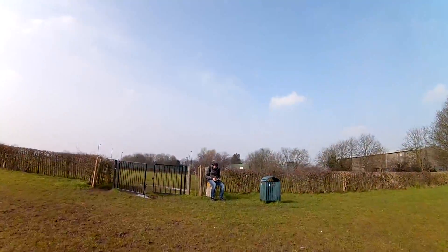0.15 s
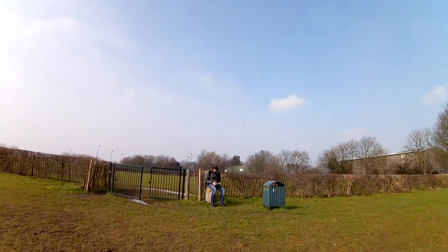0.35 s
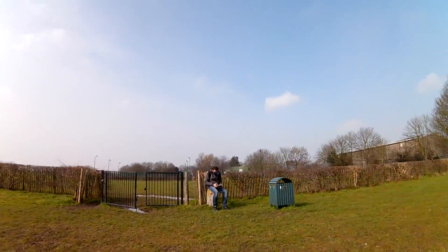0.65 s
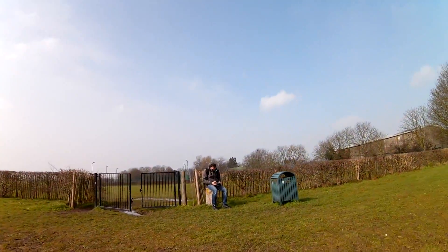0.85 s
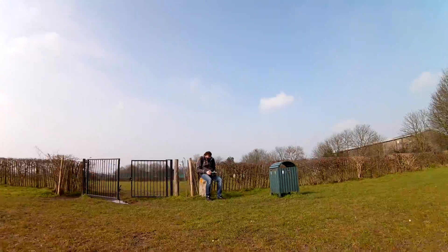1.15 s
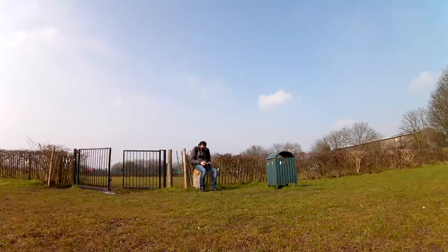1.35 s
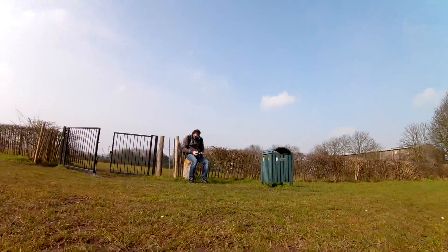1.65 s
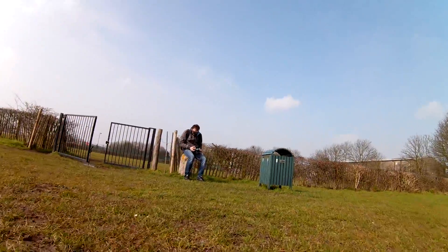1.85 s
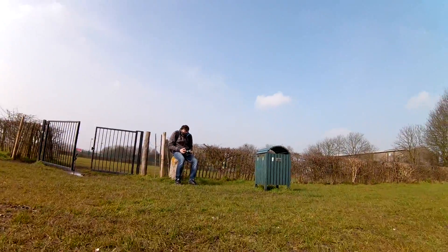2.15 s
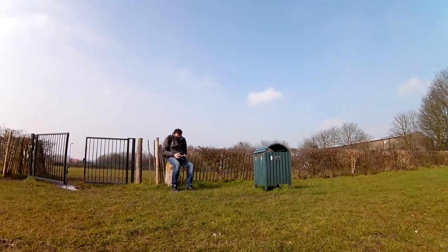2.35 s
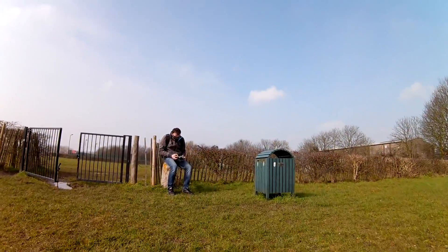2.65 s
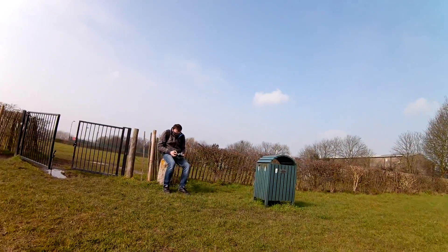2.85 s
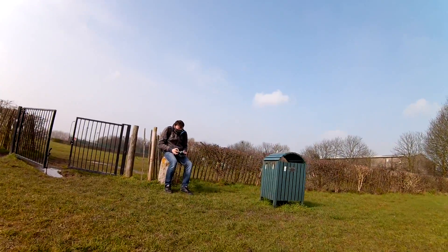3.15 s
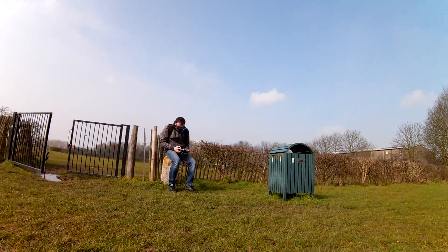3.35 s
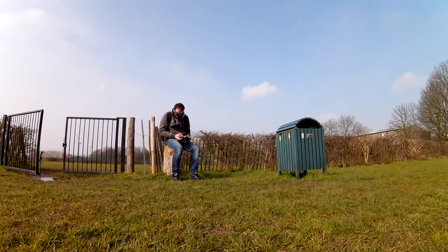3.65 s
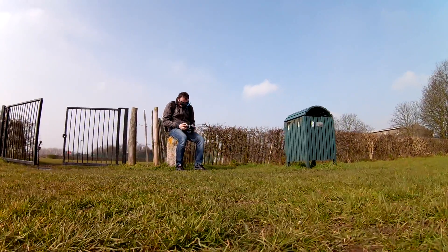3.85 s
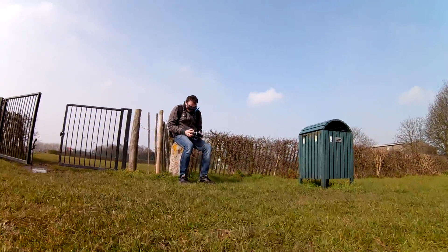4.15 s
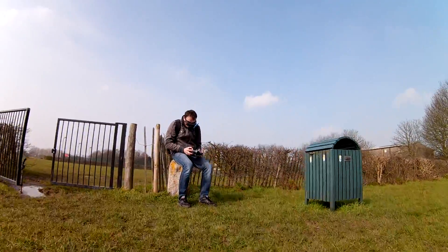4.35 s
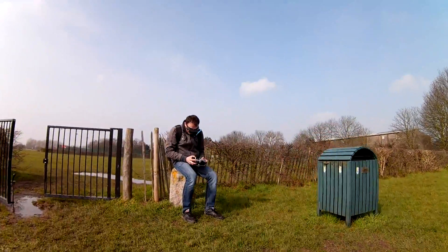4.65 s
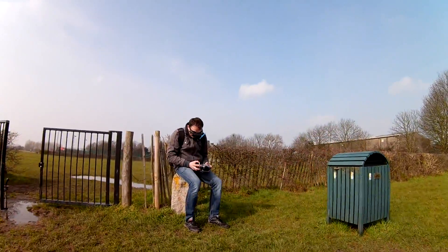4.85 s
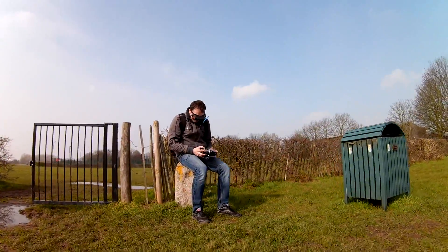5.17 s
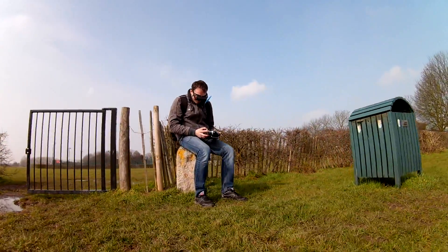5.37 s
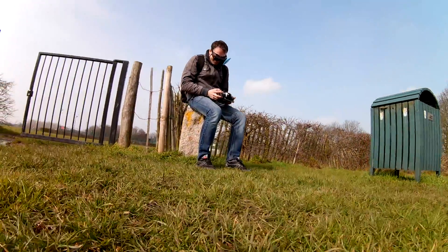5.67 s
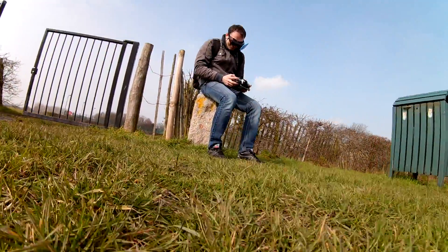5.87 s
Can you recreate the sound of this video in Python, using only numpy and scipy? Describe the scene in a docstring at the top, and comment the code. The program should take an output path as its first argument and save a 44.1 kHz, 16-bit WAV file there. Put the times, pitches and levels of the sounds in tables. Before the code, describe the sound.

Continuous close propeller buzz from a small drone, dry and outdoors, thin in the bass and gritty in the upper mids. Throttle changes bend the pitch up and down while slightly mistuned rotors beat together. Brief rattling buzzes shake the frame; rough growls swell when it skims the grass near four seconds and again at the end. The loudest surges distort, and a faint high motor whine sits above.

```python
"""Over a grassy field, a small racing quadcopter is heard by the camera on its own frame.
Four two-blade propellers sing as harmonics of their blade rates, which beat against each other.
Noise pulsed by the blades gives the wash, uneven pulse trains the blade slap, high tones the motor whine.
Resonant noise makes short frame buzzes, and low growls swell in dips to the grass; the loudest peaks clip."""
import sys
import numpy as np
from scipy import signal
from scipy.fft import rfft, irfft, next_fast_len
from scipy.io import wavfile
from scipy.ndimage import uniform_filter1d

SR = 44100
rng = np.random.default_rng(int(sys.argv[2]) if len(sys.argv) > 2 else 0)


def to_wav(sig):
    """Store sig (one row per channel, or 1-D mono) as 16-bit WAV at the path in sys.argv[1].

    Samples outside -1..1 are clipped; the rate is SR.
    """
    pcm = np.clip(np.atleast_2d(sig), -1, 1) * 32767
    pcm = np.round(pcm).astype(np.int16)
    wavfile.write(sys.argv[1], SR, pcm.T)  # frames by channels


N = 265041

# turbulence shed by the blades, lower and upper spectrum: (frequency [Hz], relative level [dB])
WASH_SPECTRUM = [(30, -54), (200, -33.5), (300, -30), (520, -25.5), (850, -20), (1300, -5), (1650, -0.5),
                 (1950, -3), (2400, 4), (2800, -4), (3300, -5.5), (3900, -3), (4800, -6), (5500, -17.5)]
HISS_SPECTRUM = [(6100, -16), (6700, -22.5), (7500, -23.5), (8300, -31), (8900, -17), (9700, -29),
                 (11500, -22), (12700, -30.5), (13800, -38), (15000, -46)]
# reference blade rate and gap between the pairs, at which the layer laws hold
CRUISE_HZ, CRUISE_SPLIT_HZ = 400, 17.5


def undb(db):
    """Decibels to gain."""
    return 10 ** (np.asarray(db) / 20)


def unit(x):
    """Scale to rms 1."""
    return x / np.sqrt(np.mean(x ** 2))


def curves(table):
    """Columns of a timed table, interpolated at every sample."""
    times_s, *columns = np.transpose(table)
    t = np.arange(N) / SR
    return [np.interp(t, times_s, column) for column in columns]


def wander(rate_hz, size=8192):
    """Smooth random signal of rms 1: coarse noise, low-passed near rate_hz."""
    hz = np.arange(size // 2 + 1) * SR / N
    lowpass = np.exp(-.5 * (hz / rate_hz) ** 2)
    coarse = irfft(rfft(rng.standard_normal(size)) * lowpass, size)
    return np.interp(np.linspace(0, size - 1, N), np.arange(size), unit(coarse))


def colour(x, spectrum):
    """Filter by (Hz, dB) points, interpolated on log frequency; rms 1."""
    hz, db = np.transpose(spectrum)
    size = next_fast_len(N, True)
    bins_hz = np.maximum(np.arange(size // 2 + 1) * SR / size, 1)
    gain = undb(np.interp(np.log(bins_hz), np.log(hz), db))
    return unit(irfft(rfft(x, size) * gain, size)[:N])


def ring(force, modes):
    """Drive parallel (Hz, width Hz, dB) resonances with a force; rms 1."""
    total = 0
    for hz, width_hz, db in modes:
        b, a = signal.iirpeak(hz, hz / width_hz, fs=SR)
        total = total + undb(db) * signal.lfilter(b, a, force)
    return unit(total)


def corrected(hz, share=.012, rate_hz=9, speed_power=6.003):
    """Small quick flight-control corrections rock a pair's speed, far more at high speed."""
    depth = share * (hz / CRUISE_HZ) ** speed_power
    return hz * (1 + depth * np.tanh(wander(rate_hz)))


def spin(hz, hunting=0.003, flutter=0.002014):
    """Blade phase of one rotor: its speed, wavering slightly in moving air, integrated."""
    wavering_hz = hz * (1 + hunting * wander(9.99) + flutter * wander(30.2))
    return 2 * np.pi * np.cumsum(wavering_hz) / SR + rng.uniform(0, 2 * np.pi)


def spool_up(hz, limit=0.37, window_s=0.4):
    """Rate of speed rise [octave/s], averaged over a window; saturates both ways."""
    octaves_per_s = np.gradient(np.log2(hz)) * SR
    rise = uniform_filter1d(octaves_per_s, size=int(window_s * SR))
    return limit * np.tanh(rise / limit)


def follow(law, hz, spool, split_hz):
    """Layer gain from rotor speed, spool-up and the gap between the pairs when steering."""
    db, speed_db, spool_db, split_db = law
    speed_octaves = np.log2(hz / CRUISE_HZ)
    split_octaves = np.log2(split_hz / CRUISE_SPLIT_HZ)
    return undb(db + speed_db * speed_octaves + spool_db * spool + split_db * split_octaves)


def blade_tone(phase, thrust, unrest, upper_law=0.77, sway=0.027, rough=0.074, blur_db=2.3):
    """Blade-pass harmonics: the first follows thrust; disturbed air shakes all and dulls the upper ones."""
    # blade harmonics, interpolated between rows: (multiple of blade rate, relative level [dB])
    blade = [(1, -1.5), (2, -7), (3, -7), (4, -5), (5, -7), (6, -8.5), (7, -11.5), (8, -11.5), (10, -14.5),
             (14, -26)]
    multiples, db = np.transpose(blade)
    gust = np.tanh(wander(29))
    swirl = wander(37) * unrest
    upper = thrust ** upper_law * undb(blur_db * (1 - unrest))
    tone = 0
    for k in np.arange(len(blade) + 2) + 1:
        strength = thrust if k == 1 else upper
        partial = rng.choice([-1, 1]) * np.sin(k * (phase + rough * swirl)) * strength
        tone = tone + undb(np.interp(k, multiples, db)) * partial * (1 + sway * np.sqrt(k) * gust)
    return tone


def wash(phases, shares, depth=0.71, swell_db=2.3):
    """Blade turbulence: noise pulsing once per blade pass, with random gusts."""
    air = 0
    for phase, share in zip(phases, shares):
        air = air + share * np.exp(depth * np.cos(phase)) * rng.standard_normal(N)
    return air * undb(swell_db * np.tanh(wander(16)))


def blade_slap(phases, shares, sharpness=14, stagger=0.17, scatter=0.65, air_db=-4):
    """Blades strike vortices left by others: sharp, uneven pulses plus torn air."""
    # slap spectrum: (frequency [Hz], relative level [dB])
    chopped_air = [(30, -28), (300, -24.5), (550, -11), (780, -6), (950, -6), (1300, 0.5), (1650, 2),
                   (2100, -13.5), (4000, -1.5), (8000, -35.5), (15000, -55)]
    slaps = 0
    for phase, share in zip(phases, shares):
        pulses = np.exp(sharpness * (np.cos(phase + stagger * wander(42)) - 1))
        slaps = slaps + share * pulses * (1 + scatter * wander(70))
    torn_air = colour(wash(phases, shares), chopped_air)
    return colour(slaps - slaps.mean(), chopped_air) + undb(air_db) * torn_air


def bursts(rows):
    """Steep-sided swells from (centre [s], peak [dB], -3 dB length [s]) rows."""
    t, swell = np.arange(N) / SR, np.zeros(N)
    for centre_s, db, length_s in rows:
        near = slice(*np.searchsorted(t, [centre_s - 2 * length_s, centre_s + 2 * length_s]))
        offset = np.abs(2 * (t[near] - centre_s) / length_s)
        swell[near] += undb(db) * np.exp2(-offset ** 3 / 2)
    return swell


def rattles(rate_per_s=22, length_s=0.0096, spread_db=2.5):
    """Short weak swells of vibration at uneven intervals through spells of shaking."""
    # spells of shaking: (start [s], end [s], relative level [dB])
    shakes = [(1.011, 1.42, -12), (2.662, 2.82, -18), (3.18, 3.56, -15), (4.979, 5.35, -14.5),
              (5.723, 5.94, -12)]
    rows = []
    for start_s, end_s, db in shakes:
        gap, strength, stretch = rng.uniform(-1, 1, size=(64, 3)).T
        times_s = start_s + np.cumsum(2 ** gap) / rate_per_s - 1 / rate_per_s
        lengths_s = length_s * 2 ** (stretch / 2)
        spell = np.transpose([times_s, db + spread_db * strength, lengths_s])
        rows.extend(spell[times_s < end_s])
    return bursts(rows)


def frame_buzz(phase, depth=0.48, grit_db=-8, buzz_db=1.5):
    """Blade-pulsed vibration rattles the frame at its resonances, in bursts."""
    # hard bursts: (centre [s], relative peak [dB], length [s])
    buzzes = [(1.114, -10, .009), (1.23, -11.5, 0.018), (1.338, -9, .012), (1.406, -9, .014),
              (1.435, -7.5, 0.017), (1.5, -10, 0.025), (1.662, -7, .011), (1.866, -9, 0.012),
              (2.088, -9, .03), (2.215, -9, 0.021), (2.276, -8, .012), (2.35, -9.5, 0.029),
              (2.42, -7.5, 0.043), (2.474, -7, 0.027), (3.091, -10, 0.021), (3.272, -12.5, 0.0091),
              (3.332, -9, .012), (3.368, -9.5, 0.023), (3.436, -10, 0.014), (3.588, -8, 0.011),
              (3.661, -9.5, 0.033), (4.177, -8.5, 0.0099), (5.214, -10, 0.012), (5.37, -6.5, .011),
              (5.411, -6.5, 0.01), (5.446, -6.5, 0.011), (5.554, -8, 0.015), (5.586, -8, 0.015),
              (5.828, -8.5, 0.028), (5.884, -10.5, 0.0061)]
    # frame resonances: (frequency [Hz], width [Hz], relative level [dB])
    frame = [(1544, 71, -9), (2393, 110, 9.5), (3017, 47, 2), (4244, 286, -7), (5550, 110, -9.5)]
    # soft camera mount, passes little treble: (frequency [Hz], relative level [dB])
    mount = [(100, -32), (1000, 4), (2000, 1.5), (5600, 1), (7500, -12), (12000, -3), (15000, -16)]
    swell = np.maximum(bursts(buzzes), rattles())
    force = rng.standard_normal(N) * np.exp(depth * np.cos(phase))
    body = ring(force, frame)
    # the loose part swings between its stops, so its amplitude stays even
    body = body / np.sqrt(uniform_filter1d(body ** 2, size=120))
    grit = colour(force, WASH_SPECTRUM + HISS_SPECTRUM)
    return undb(buzz_db) * swell * colour(body + undb(grit_db) * grit, mount)


def ground_effect(rise_db_per_s=141, fall_db_per_s=85):
    """Gain of the near-grass layers: swells as the craft sinks, holds, fades as it lifts."""
    # dips to just above the grass: (start [s], length [s], relative level [dB])
    skims = [(3.935, 0.16, -16), (5.72, .04, -17.5), (5.979, .05, -25)]
    t = np.arange(N) / SR
    gain = 0
    for start_s, length_s, db in skims:
        before_db = rise_db_per_s * np.maximum(start_s - t, 0)
        after_db = fall_db_per_s * np.maximum(t - start_s - length_s, 0)
        gain = gain + undb(db - before_db - after_db)
    return gain


def growl(phases, shares, smear=0.67, air_db=-4, throb=0.11, count=3):
    """Returning eddies scramble each blade stroke, smearing low harmonics into rough bands."""
    # growl spectrum: (frequency [Hz], relative level [dB])
    growl_spectrum = [(30, -16), (250, -26.5), (450, -15), (620, -16), (780, -8), (920, 2), (1100, -1),
                      (1400, 1), (1700, 4), (2100, -40), (4000, -2), (8000, -27), (15000, -58)]
    bands = 0
    for phase, share in zip(phases, shares):
        for k in np.arange(count) + 2:
            bands = bands + share * np.sin(k * (phase + smear * wander(44))) * wander(16)
    noise = colour(rng.standard_normal(N), growl_spectrum)
    air = colour(bands, growl_spectrum) + undb(air_db) * noise
    return air * (1 + throb * np.tanh(wander(29)))


def skim_tones(phases, shares):
    """Clear low harmonics from blades working against the cushion of air under them."""
    # lifted harmonics: (multiple of blade rate, level against the growl [dB])
    harmonics = [(2, -8.5), (3, -13), (4, -17)]
    tones = 0
    for phase, share in zip(phases, shares):
        for k, db in harmonics:
            start = rng.uniform(0, 2 * np.pi)
            tones = tones + share * undb(db) * np.sin(np.round(k) * phase + start)
    return tones


def magnet_tones(phase, low_db=-3, waver_db=2):
    """Magnets pass the stator teeth: tones at 14 and 28 times the blade rate."""
    magnets = 14 * phase
    return (np.sin(2 * magnets) + undb(low_db) * np.sin(magnets)) * undb(waver_db * wander(3.5))


def motor_whine(phases, shares):
    """Magnetic tones of all motors, ringing the motor bells where they sweep through; rms 1."""
    # bell resonances, applied twice in series: (frequency [Hz], width [Hz], relative level [dB])
    bells = [(5860, 1900, -9), (8720, 600, -11.5)]
    magnets = sum(share * magnet_tones(phase) for phase, share in zip(phases, shares))
    return ring(ring(magnets, bells), bells)


def scene(whine_db=-40, unrest_law=0.46):
    """Two rotors to a pair, each at its own speed and share, mixed with air, buzz and whine."""
    # blade rate of each rotor pair: (time [s], leading [Hz], trailing [Hz])
    speed = [(0, 351, 331.4), (.17, 332.5, 300.4), (.58, 325.1, 296.3), (.9, 317.4, 282.4),
             (1, 347.8, 320.4), (1.3, 422.8, 393.6), (1.52, 407, 388.8), (1.73, 414.1, 388),
             (2.2, 404.7, 390.7), (2.52, 402.5, 394.5), (2.7, 361.2, 352.6), (3.2, 357.5, 346.7),
             (3.31, 382.9, 369.2), (3.81, 407.8, 380.8), (3.95, 471.1, 424.2), (4.08, 462, 414.5),
             (4.13, 434.8, 418.3), (4.33, 433, 415.4), (4.56, 323.2, 312.2), (4.9, 285.4, 277.4),
             (5, 346.3, 328.6), (5.25, 353.9, 336.3), (5.66, 445.7, 400), (5.76, 430, 404.8),
             (5.84, 379.4, 345.4), (5.9, 418, 328.4), (6.01, 405, 277.9)]
    # calmer and rougher air along the path, scales rush and slaps: (time [s], level [dB])
    rough_air = [(0, -1), (.5, -1.5), (1.35, 2), (1.85, -1.5), (2.4, 0.5), (2.9, -0.5), (3.4, 0.5),
                 (3.8, -1), (5.5, 1), (6.01, 1)]
    # layer laws: (cruise level [dB], per doubling of speed [dB], per octave/s of spool-up [dB],
    # per doubling of the gap between the pairs [dB])
    tone_law = (-20.5, 21, 1.5, 0.5)
    rush_law = (-17, 14, 2.5, 1)
    slap_law = (-25, 5.5, 3.5, 4.5)

    lead_hz, trail_hz = curves(speed)
    mean_hz = (lead_hz + trail_hz) / 2
    split_hz = np.maximum(lead_hz - trail_hz, 1)
    spool = spool_up(mean_hz)
    unrest = np.minimum(split_hz / CRUISE_SPLIT_HZ, 2) ** unrest_law  # steering stirs the air
    lead_hz, trail_hz = corrected(lead_hz), corrected(trail_hz)
    speeds_hz = np.array([lead_hz, trail_hz, lead_hz - .3 * split_hz, trail_hz + .15 * split_hz])
    phases = [spin(hz) for hz in speeds_hz]
    # each rotor grows steeply louder with its own tip speed
    efforts = follow(tone_law, speeds_hz, spool, split_hz) / undb(tone_law[0])

    # near rotors dominate the steady tones; slaps come from all four
    steady_shares = undb([0.5, -3.5, -8.5, -19.5])
    whine_shares = undb([0.0, -3, -20, -17])
    slap_shares = undb([0, -1.0, -10.5, -3.5])[:, None] * efforts / efforts[0]

    tones = 0
    for phase, share, effort in zip(phases, steady_shares, efforts):
        tones = tones + share * blade_tone(phase, effort, unrest)
    tones = undb(tone_law[0]) * tones
    rush = colour(wash(phases, steady_shares), WASH_SPECTRUM + HISS_SPECTRUM)
    rush = follow(rush_law, mean_hz, spool, split_hz) * rush
    slap = follow(slap_law, mean_hz, spool, split_hz) * blade_slap(phases, slap_shares)
    air = undb(curves(rough_air)[0]) * (rush + slap)
    buzz = frame_buzz(phases[0])
    skim = ground_effect() * (growl(phases, slap_shares) + skim_tones(phases, slap_shares))
    whine = undb(whine_db) * motor_whine(phases, whine_shares)
    return (tones + air + buzz + skim + whine)[None]


def record(dry, ceiling=0.9, low_cut_hz=117, top_hz=15250):
    """The microphone thins the bass, its port cancels two narrow bands, peaks clip, the top is cut."""
    # nulls of the microphone port: (frequency [Hz], width [Hz])
    port_nulls = [(7950, 420), (13350, 500)]
    low_cut = signal.butter(2, low_cut_hz, "highpass", fs=SR, output="sos")
    dry = signal.sosfilt(low_cut, dry)
    for hz, width_hz in port_nulls:
        b, a = signal.iirnotch(hz, hz / width_hz, fs=SR)
        dry = signal.filtfilt(b, a, dry)
    clipped = dry / (1 + (dry / ceiling) ** 20) ** (1 / 20)
    top_cut = signal.ellip(10, .2, 85, top_hz, fs=SR, output="sos")
    return signal.sosfilt(top_cut, clipped)


dry = scene()
out = record(dry)
to_wav(out)
```